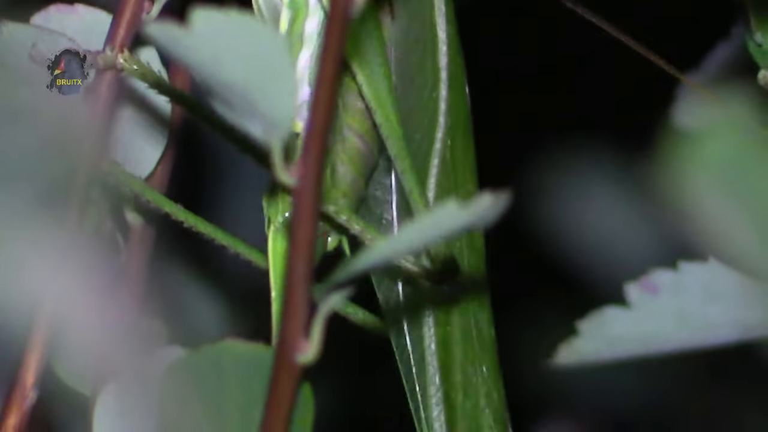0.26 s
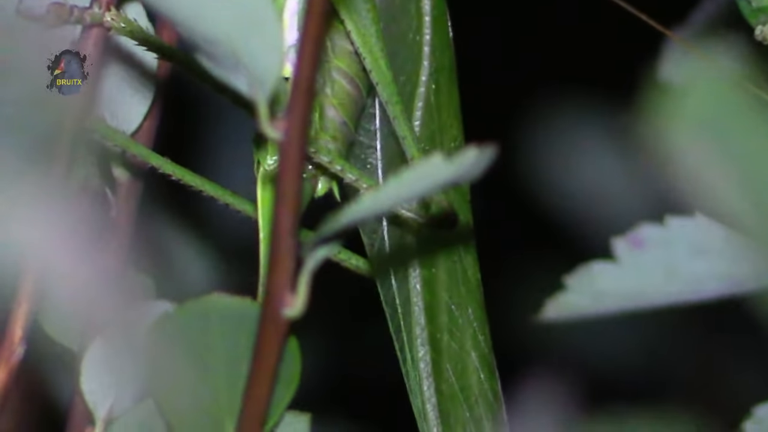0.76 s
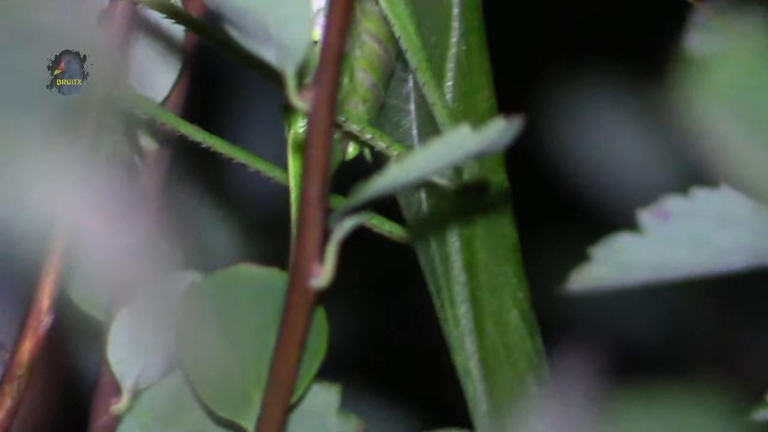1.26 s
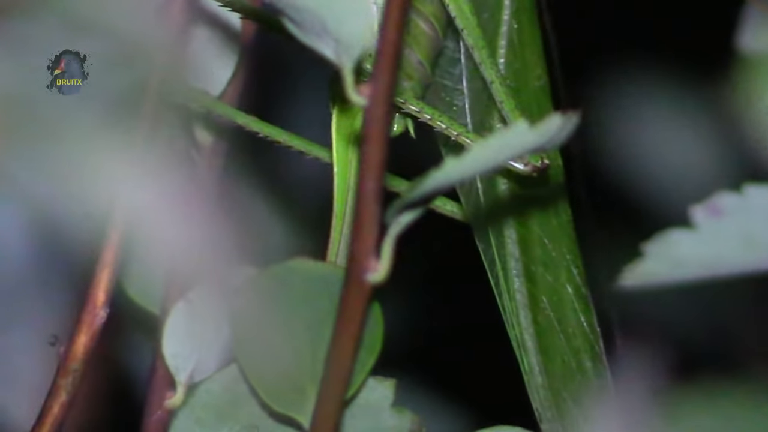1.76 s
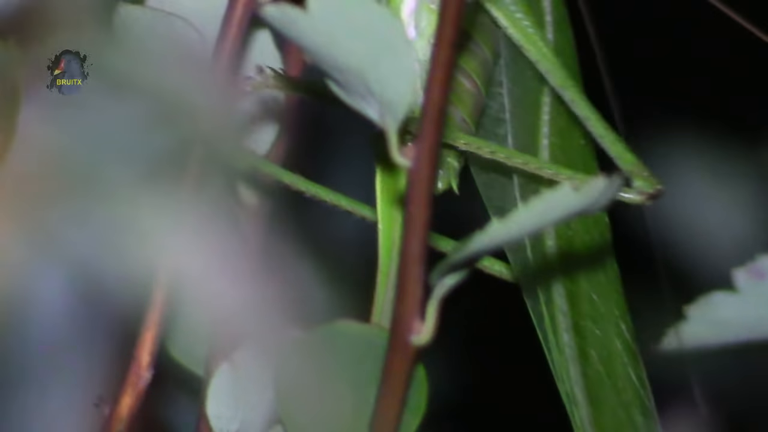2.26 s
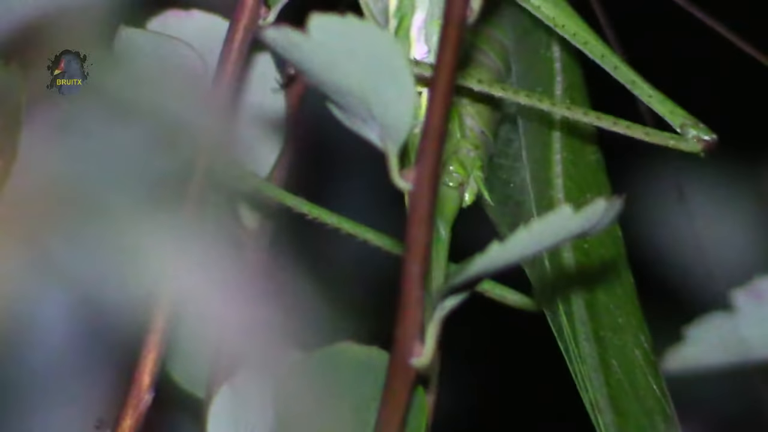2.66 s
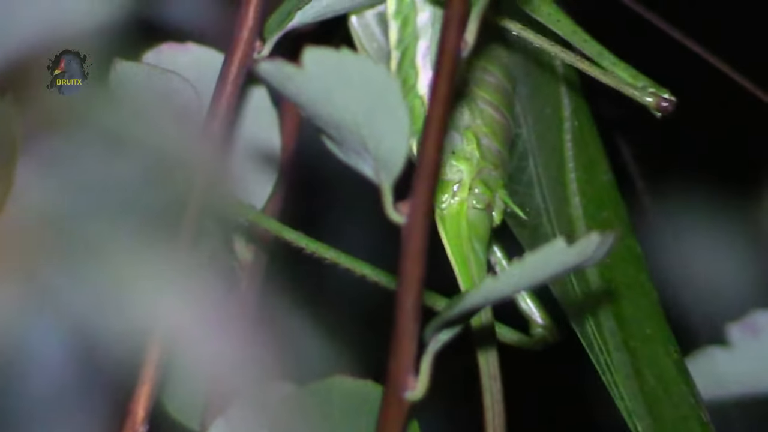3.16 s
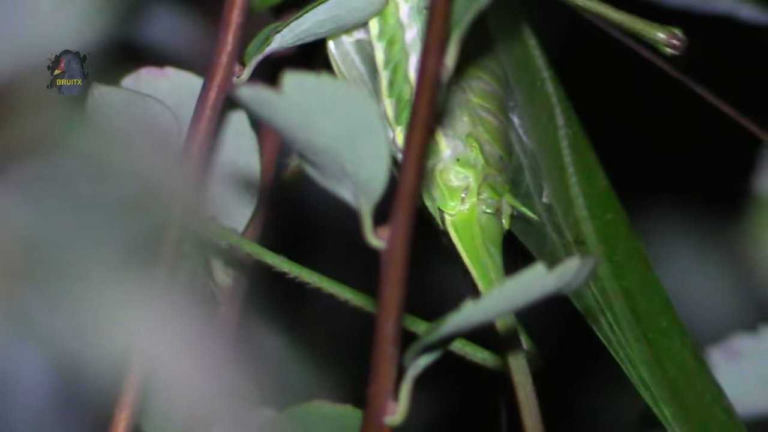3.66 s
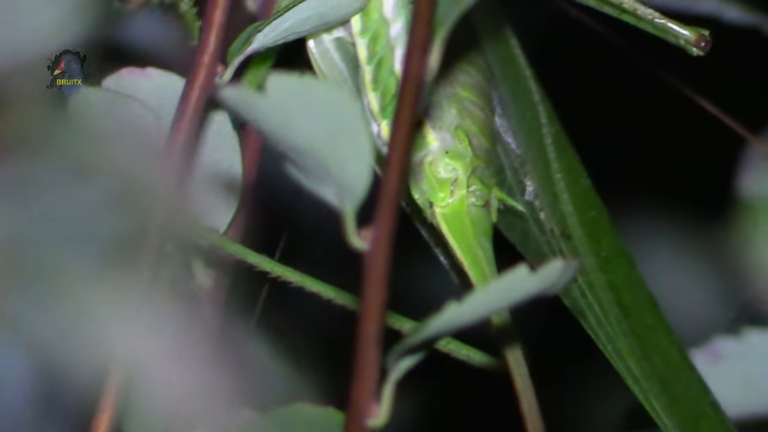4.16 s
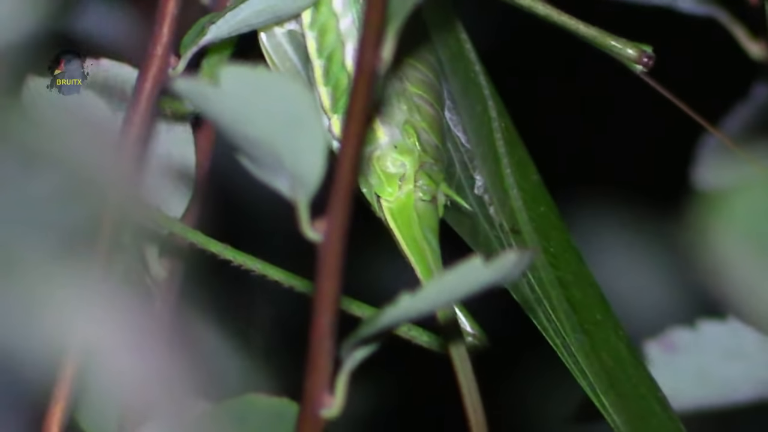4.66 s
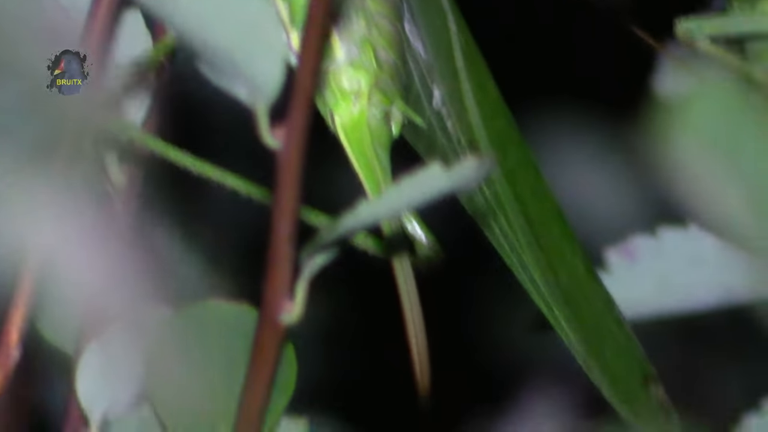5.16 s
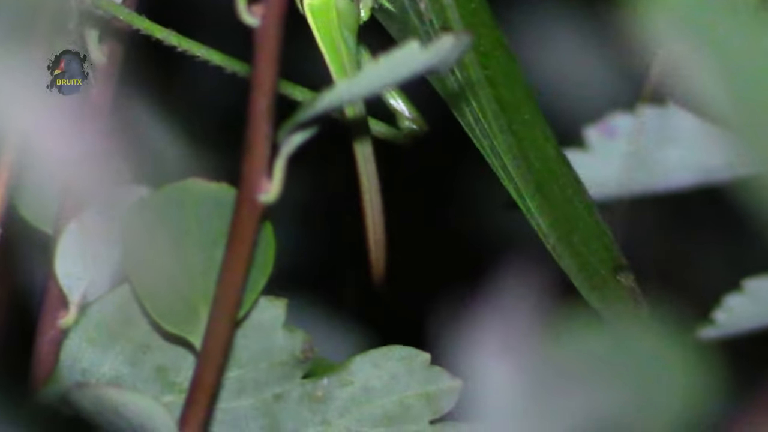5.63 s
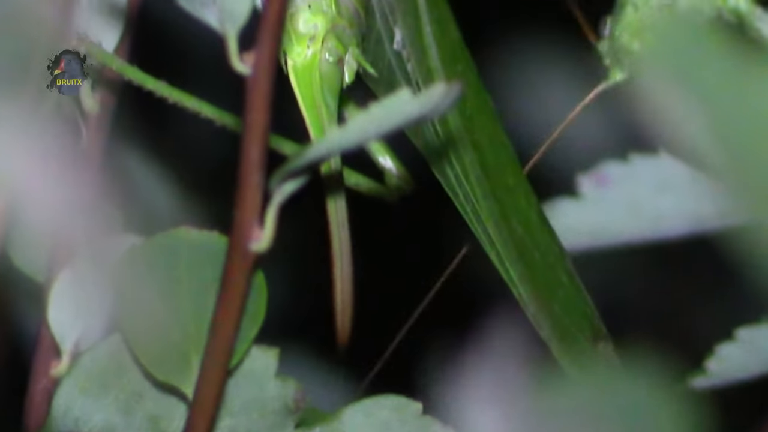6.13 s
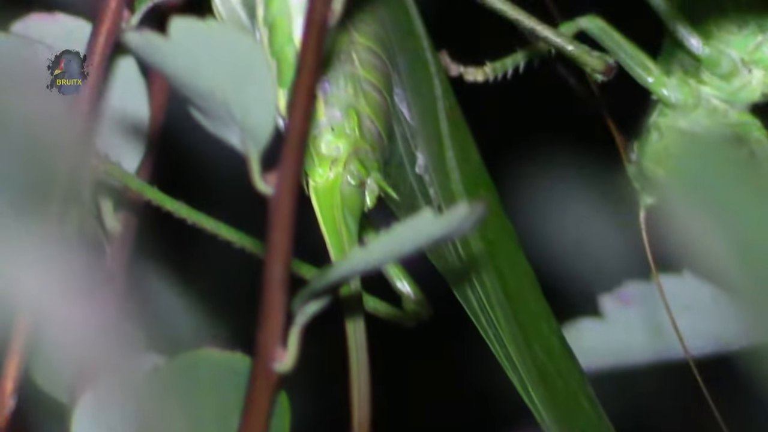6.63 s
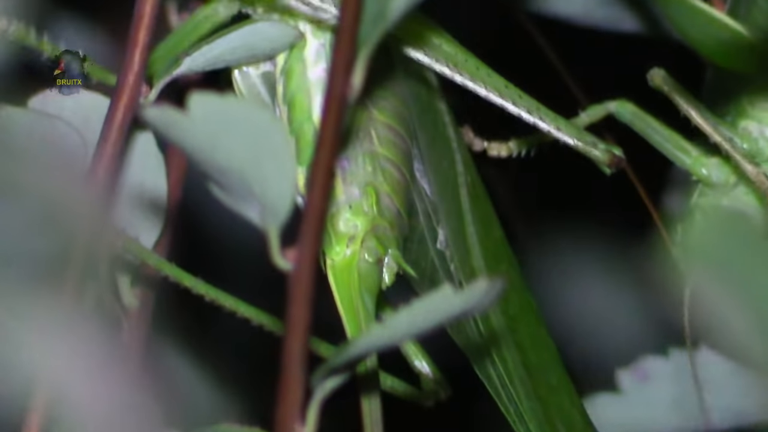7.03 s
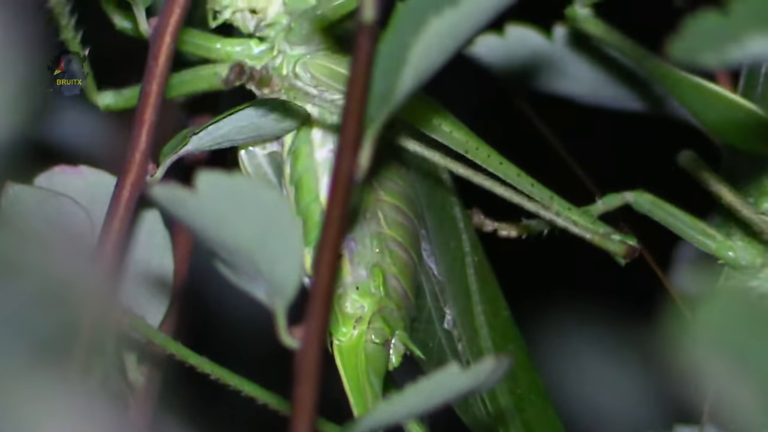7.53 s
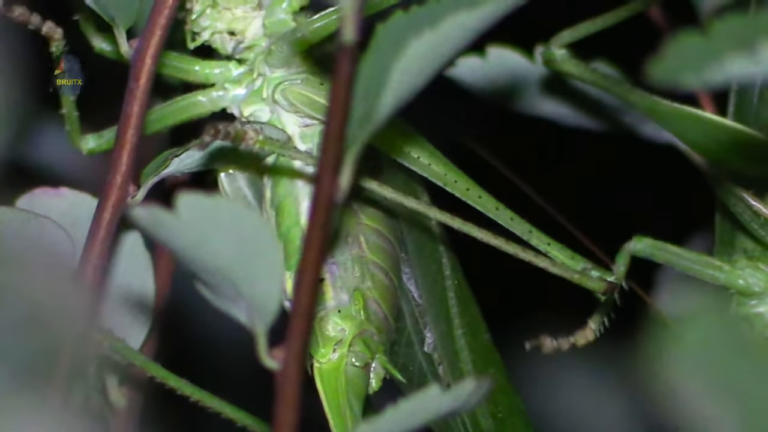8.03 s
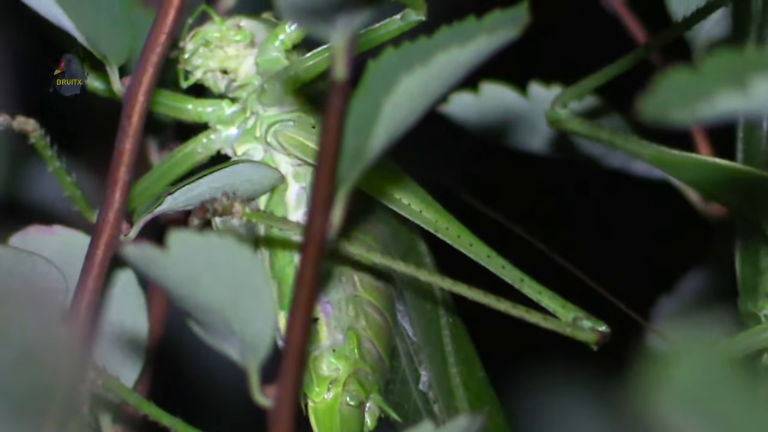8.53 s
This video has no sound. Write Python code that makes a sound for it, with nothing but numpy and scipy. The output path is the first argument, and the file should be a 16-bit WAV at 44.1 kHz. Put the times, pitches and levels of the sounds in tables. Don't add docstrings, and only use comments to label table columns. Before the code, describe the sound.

Loud, gritty, metallic bush-cricket chirping fills the first three quarters of a second, clipping at close range, then ceases abruptly. What remains is quiet: a rival shuffling far along the hedge, cone-head bush-crickets buzzing almost at the limit of hearing, and a tree cricket's mellow, down-sliding pulses in repeated trills, echoing faintly off trunks. Distant traffic rumble, light hiss and two tiny ticks sit underneath.

```python
import sys
import numpy as np
from scipy import signal
from scipy.fft import rfft, irfft, next_fast_len
from scipy.io import wavfile
from scipy.ndimage import map_coordinates

SR = 44100
rng = np.random.default_rng(int(sys.argv[2]) if len(sys.argv) > 2 else 0)


def log_audio(samples):
    frames = np.atleast_2d(samples).T
    limited = np.clip(frames, -1, 1)
    pcm = np.round(limited * 32767).astype(np.int16)
    wavfile.write(sys.argv[1], SR, pcm)


def attenuation_scalar(level_db):
    decades = np.asarray(level_db, float) / 20
    return 10 ** decades


N = 387638


def unit(x):
    return x / np.sqrt(np.mean(x ** 2) + 1e-20)


def along(points, hz):
    point_hz, value = np.transpose(points)
    return np.interp(np.log(hz + 1), np.log(point_hz + 1), value)


def curve(rows):
    return np.interp(np.arange(N) / SR, *np.transpose(rows))


def wobble(rate):
    knots = rng.standard_normal(int(N * rate / SR) + 4)
    return map_coordinates(knots, [np.arange(N) * rate / SR])


def noise():
    return rng.standard_normal(N)


def filtered(x, response):
    size = next_fast_len(N + SR // 2)
    spectrum = rfft(x, size) * response(np.fft.rfftfreq(size, 1 / SR))
    return irfft(spectrum, size)[..., :N]


def colour(points):
    return lambda f: attenuation_scalar(along(points, f))


def modes(peaks):
    def response(f):
        total = 0
        for k, (hz, width, db) in enumerate(peaks):
            total = total + (-1) ** k * attenuation_scalar(db) * 1j * f * width / (hz * hz - f * f + 1j * f * width)
        return total
    return response


def teeth(rate, scatter, spread_db):
    count = int(N * rate / SR)
    at = (np.arange(count) + scatter * rng.random(count)) * SR / rate
    size = attenuation_scalar(spread_db * rng.standard_normal(count)) * rng.choice([-1, 1], count)
    return unit(np.bincount(np.clip(at, 0, N - 1).astype(int), size, N))


def swells(rows, crest, sharp):
    out = np.zeros(N + 2 * SR)
    for start, end, db in rows:
        share = np.linspace(0, 1, int((end - start) * SR))
        bent = np.interp(share, [0, np.clip(crest, .05, .95), 1], [0, np.pi / 2, np.pi])
        out[SR + round(start * SR):][:len(share)] += attenuation_scalar(db) * np.abs(np.sin(bent)) ** sharp
    return out[SR:SR + N]


def rung(clicks, pressure, response):
    return filtered(clicks * pressure, response) / np.std(filtered(clicks, response))


def leaves(x, t60, wet_db, dull_hz=SR):
    t = np.arange(int(1.5 * t60 * SR)) / SR
    tail = rng.standard_normal(len(t)) * attenuation_scalar(-60 * t / t60)
    wet = signal.fftconvolve(x, tail / np.linalg.norm(tail))[:N]
    return x + attenuation_scalar(wet_db) * filtered(wet, lambda f: 1 / (1 + (f / dull_hz) ** 6))


# start in seconds, first stroke in dB,
# second stroke in dB, wing opening in dB.
CHIRPS = [(.015, -5.5, -7, -29), (.101, -7, -8, -23), (.187, -7.5, -8, -19), (0.273, -6.5, -6, -20),
          (0.362, -6.5, -6.5, -23), (.452, -7.5, -6.5, -17), (0.544, -7, -8.5, -18), (.641, -8, -6.5, -17)]
# resonance in Hz, width in Hz, level in dB.
NEAR_MIRROR = [(8530, 200, -11), (9130, 99, 2), (9670, 210, -2), (10350, 163, 6.5), (11270, 210, -10.5),
               (11440, 340, -4.5), (12400, 260, -22), (15600, 740, -11)]
# frequency in Hz, level in dB per Hz.
TOOTH_CLICK = [(3000, -69), (5000, -46), (7100, -19.5), (8800, -4.5), (9600, -9.5), (10300, -2.5),
               (10850, -1.5), (11300, -6), (11850, -11), (12300, -5), (13100, -15), (13600, -23),
               (15300, -12), (15800, -17.5)]
# resonance in Hz, width in Hz, level in dB.
OPENING_WING = [(6600, 720, -6), (8130, 650, 3.5), (10300, 1800, 1), (14500, 2000, -6)]
FIRST_S, SECOND_AFTER_S, SECOND_S, OPEN_BEFORE_S = .016, .0263, .023, .016


def near_singer():
    first, second, back = [], [], []
    for start, first_db, second_db, open_db in CHIRPS:
        again = start + SECOND_AFTER_S
        first.append((start - .006, start + FIRST_S + .001, first_db))
        second.append((again + .0008, again + SECOND_S + .0017, second_db))
        for s, db in [(start - OPEN_BEFORE_S, open_db), (again - .007, open_db - 15.5)]:
            back.append((s - .007, s + .004, db))
    clicks = teeth(rate=1900, scatter=.8, spread_db=3)
    early = swells(first, crest=.54, sharp=1.8) + swells(second, crest=.15, sharp=1)
    late = swells(first, crest=.72, sharp=2.44) + swells(second, crest=.58, sharp=1.54)
    scraping = attenuation_scalar(-3) * rung(clicks, early, colour(TOOTH_CLICK))
    ringing = attenuation_scalar(3) * rung(clicks, late, modes(NEAR_MIRROR))
    open_clicks = teeth(rate=2600, scatter=.8, spread_db=0)
    open_pressure = swells(back, crest=.88, sharp=3.8)
    opening = rung(open_clicks, open_pressure, lambda f: modes(OPENING_WING)(f) ** 2)
    return leaves(scraping + ringing + opening, t60=.1, wet_db=-9, dull_hz=13400)


# chirp number, time of its second stroke in seconds.
RIVAL_PACE = [(0, -.143), (16, 1.276), (32, 2.689), (40, 3.407), (56, 4.817), (60, 5.172), (72, 6.244),
              (84, 7.311), (104, 9.08)]
# frequency in Hz, level in dB per Hz.
RIVAL_TONE = [(5000, -52), (8000, -29), (8600, -18), (9000, -7.5), (9900, 1.5), (10400, -1.5), (11000, -4),
              (11800, -12.5), (12600, -14), (14000, -38)]
# peak in Hz, width in Hz, level
# in dB.
RIVAL_PEAKS = [(9100, 31, -6), (10370, 21, -6), (9950, 280, -5), (10300, 36, -19), (10600, 41, -6),
               (10800, 48, -16), (11700, 37, -16), (12000, 49, -17)]
RIVAL_DB = -43


def rival():
    number, s = np.transpose(RIVAL_PACE)
    at = np.interp(np.arange(number[-1]), number, s)
    vary = rng.standard_normal((len(at), 4)) * [.00082, .00084, .56, .4]
    one, two = at + vary[:, 0], at + vary[:, 1]
    first = np.transpose([one - .039, one - .021, RIVAL_DB + 4 + vary[:, 2]])
    second = np.transpose([two - .012, two + .011, RIVAL_DB + 2.5 + vary[:, 3]])
    pressure = swells(first, crest=.58, sharp=1.1) + swells(second, crest=.32, sharp=.69)
    tone = lambda f: colour(RIVAL_TONE)(f) * (1 + 1.1 * modes(RIVAL_PEAKS)(f))
    song = rung(teeth(rate=3000, scatter=.9, spread_db=1.5), pressure, tone)
    farther = attenuation_scalar(-52) * unit(filtered(noise(), colour(RIVAL_TONE)))
    return leaves(song, t60=.13, wet_db=-1) + farther


STROKE_TEETH = [1, .45, .3, .25, .35, .45]


def cone_head(stroke):
    tooth = np.floor(stroke * len(STROKE_TEETH)).astype(int)
    hit = np.diff(tooth, prepend=tooth[0]) > 0
    strength = np.take(STROKE_TEETH, tooth % len(STROKE_TEETH)) * attenuation_scalar(2.5 * noise())
    clicks = hit * strength * rng.choice([-1, 1], N)
    return unit(leaves(clicks, t60=.02, wet_db=-1.5))


# frequency in Hz, level in dB per Hz.
BUZZ_TONE = [(11000, -38), (13150, -13), (13600, -0.5), (14000, -3), (14350, 1), (14700, -2), (15000, 0),
             (15250, 1), (15500, -2), (15800, -4)]
BUZZ_START_S, BUZZ_PER_S, BUZZ_DB = -.0568, 86.655, -41


def cone_heads():
    t = np.arange(N) / SR
    first = cone_head(BUZZ_PER_S * (t - BUZZ_START_S) + 1 / 30)
    second = cone_head(93.1 * t + .2 * wobble(1.5))
    blur = unit(leaves(noise(), t60=.04, wet_db=-7))
    crowd = first + attenuation_scalar(-7) * second + blur
    return attenuation_scalar(BUZZ_DB + .6 * wobble(6)) * unit(filtered(crowd, colour(BUZZ_TONE)))


# first pulse in seconds, last pulse in seconds, number of pulses.
TRILLS = [(-.008, .339, 12), (.586, 1.155, 19), (1.413, 2.107, 23), (2.325, 2.925, 20), (3.122, 3.785, 22),
          (3.974, 4.636, 22), (4.871, 5.661, 26), (5.912, 6.513, 20), (6.773, 7.37, 20), (7.616, 8.148, 18),
          (8.368, 8.772, 14)]
# time in seconds, level in dB.
FACING = [(.07, -36.5), (.24, -35.5), (.33, -44), (.59, -43), (.63, -35.5), (1.08, -37), (1.52, -39.5),
          (2.64, -40), (2.86, -40), (3.69, -38), (4.32, -37.1), (4.54, -40.5), (5.0, -38.5), (5.28, -32.5),
          (5.55, -31), (6.6, -30), (7.09, -28), (8.73, -28.5)]
# delay in seconds, level in dB, change in dB per dB of facing.
TRUNKS = [
    (.019, -45, -.3),
    (.035, -56, .3),
    (.048, -54, .4),
    (.064, -58, .3),
    (.08, -60, .2),
    (.11, -62, .1),
]
TRILL_HZ, SAG_HZ_PER_S, PULSE_S = 2874, 7200, .0245


def tree_cricket():
    at = np.concatenate([np.linspace(a, b, int(n)) for a, b, n in TRILLS])
    vary = rng.standard_normal((len(at), 4))
    t = np.arange(-.0112, PULSE_S - .0112, 1 / SR)
    shape = np.sin(np.pi * np.linspace(0, 1, len(t)) ** .86) ** 1.27
    turns = (TRILL_HZ + 9 * vary[:, :1]) * t - SAG_HZ_PER_S / 2 * t * t
    phase = 2 * np.pi * (turns + vary[:, 1:2])
    tone = np.sin(phase) + attenuation_scalar(-35) * np.sin(2 * phase)
    pulses = attenuation_scalar(.83 * vary[:, 2:3]) * shape * tone
    where = np.round((1 + at[:, None] + .0008 * vary[:, 3:] + t) * SR).astype(int)
    song = np.sqrt(2) * np.bincount(where.ravel(), pulses.ravel(), N + 2 * SR)
    facing_db = curve(FACING)
    turned_db = facing_db + 38
    echoes = np.zeros(N)
    for lag, db, slope in TRUNKS:
        echo_db = db + slope * turned_db + 1.5 * wobble(12)
        echoes += attenuation_scalar(echo_db) * song[SR - round(lag * SR):][:N]
    direct = attenuation_scalar(facing_db - 2) * leaves(song[SR:SR + N], t60=.22, wet_db=-23)
    return direct + leaves(echoes, t60=.12, wet_db=-11)


# frequency in Hz, level in dB per Hz.
AIR = [(12, -53), (20, -35), (38, -3.5), (97, 0), (152, -8), (271, -11), (366, -13.5), (495, -15.5),
       (669, -16), (777, -16), (1920, -21), (3010, -23.5), (3500, -26), (8000, -31.5), (10400, -39),
       (17600, -120)]
# start in seconds, level in dB, pitch in Hz.
TICKS = [
    (2.375, -50, 1500),
    (6.016, -43, 1000),
]
AIR_DB = -43


def night_air():
    air = attenuation_scalar(AIR_DB + .49 * wobble(1.46)) * unit(filtered(noise(), colour(AIR)))
    air += attenuation_scalar(-56) * unit(filtered(noise(), lambda f: f > 7600))
    t = np.arange(SR // 50) / SR
    for s, db, hz in TICKS:
        decay = attenuation_scalar(db + 13.5 - 60 * t / .014)
        air[round(s * SR):][:len(t)] += decay * np.sin(2 * np.pi * hz * t)
    return air


def scene():
    singers = near_singer() + rival() + cone_heads() + tree_cricket()
    return (singers + night_air())[None]


def roll_off(x):
    return signal.sosfilt(signal.butter(12, 16810, fs=SR, output="sos"), x)


TOP_HZ = 15750


def record(dry):
    lopsided = dry + .018 * dry ** 2 * np.abs(dry)
    clipped = lopsided / (1 + np.abs(lopsided / .82) ** 6) ** (1 / 6)
    limited = filtered(clipped, lambda f: (f < TOP_HZ) * np.clip(f / 25, 0, 1))
    return roll_off(limited)


dry = scene()
out = record(dry)
log_audio(out)
```